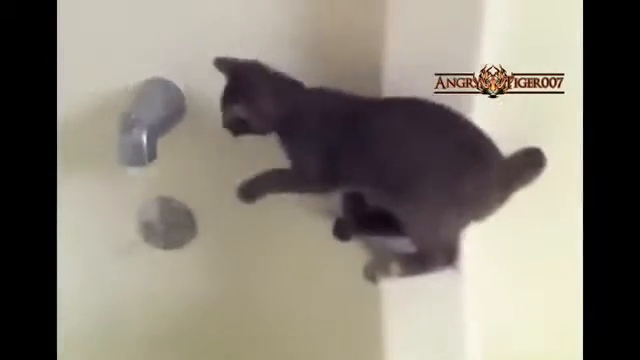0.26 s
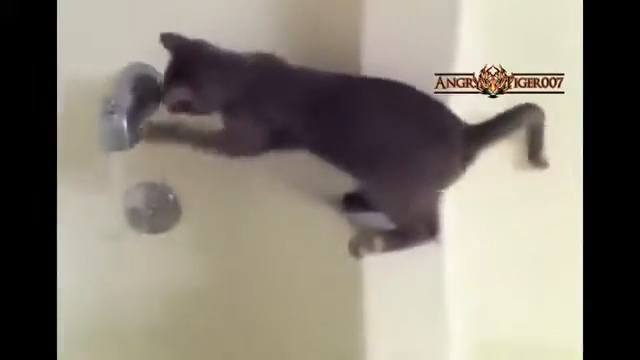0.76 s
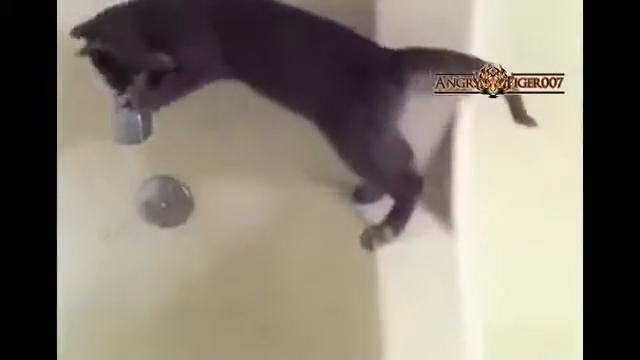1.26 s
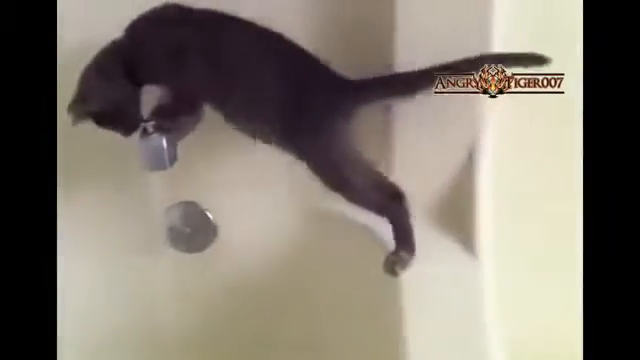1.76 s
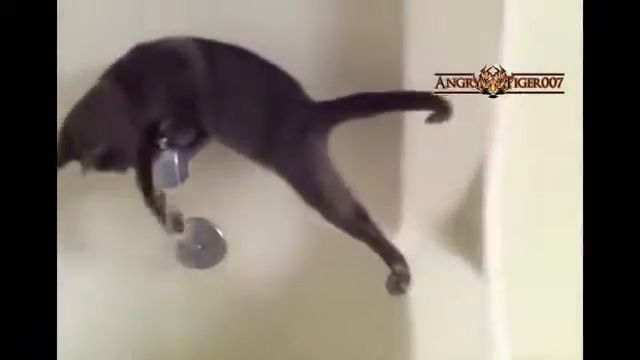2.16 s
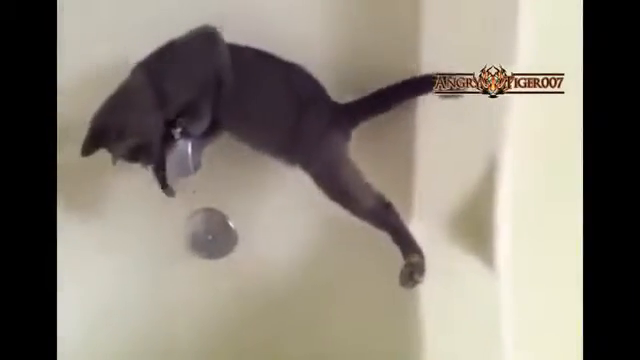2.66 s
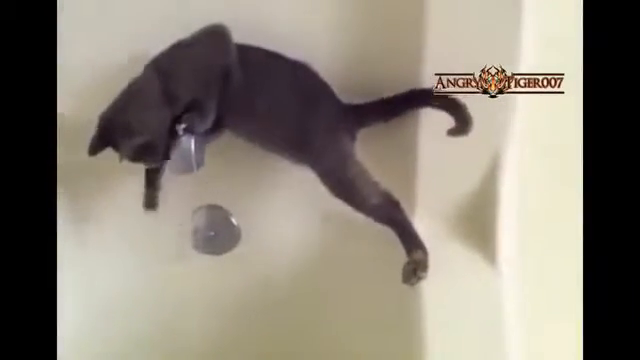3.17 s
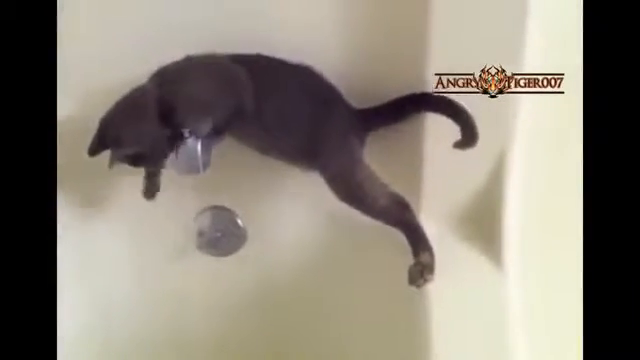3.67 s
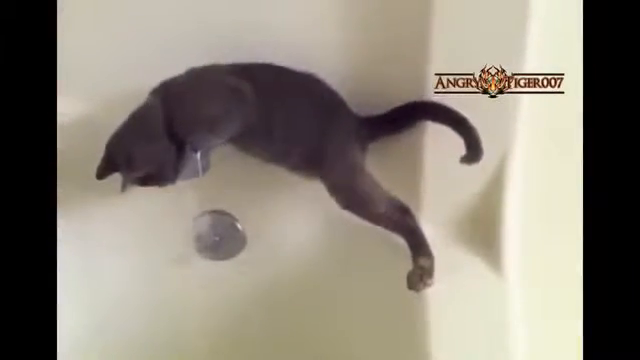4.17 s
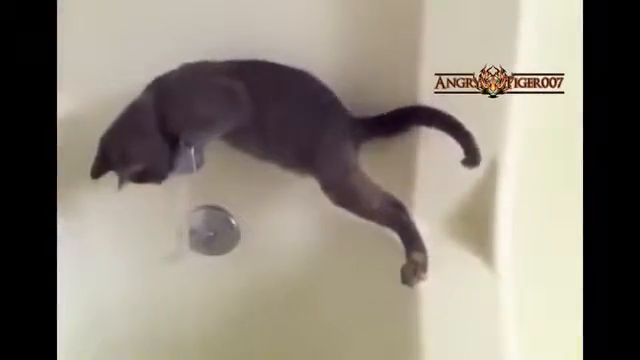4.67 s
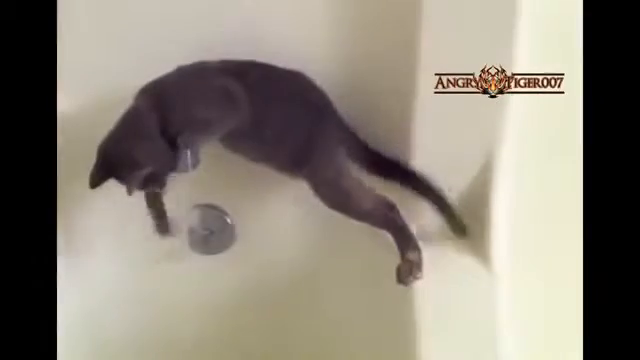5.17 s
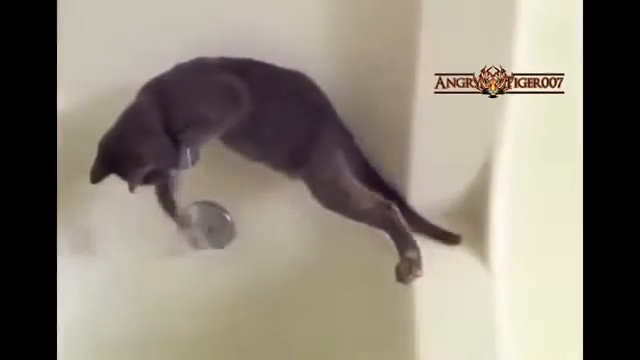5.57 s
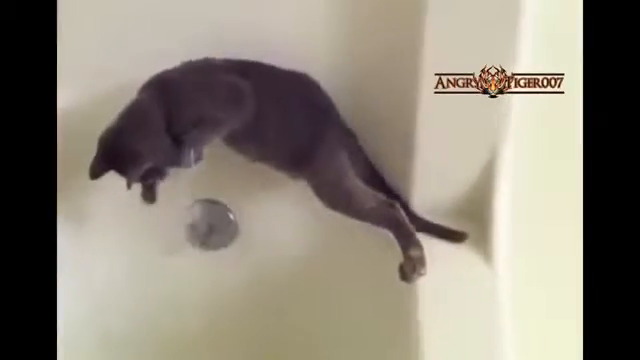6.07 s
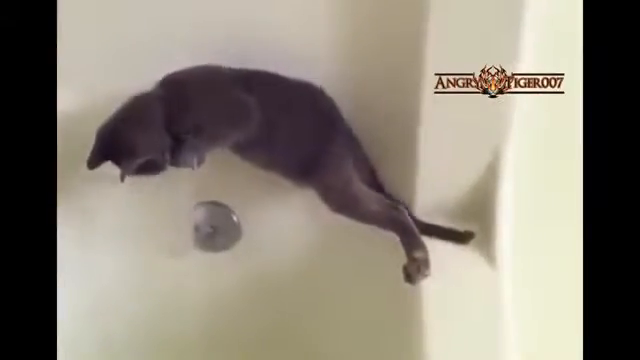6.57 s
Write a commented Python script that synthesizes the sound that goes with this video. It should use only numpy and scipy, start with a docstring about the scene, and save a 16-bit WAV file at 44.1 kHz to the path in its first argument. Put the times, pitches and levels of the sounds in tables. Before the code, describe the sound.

Close, splashy trickle from a tub tap: fine fizzing patter, sharp uneven drops, tiny chirping bubbles, and barely audible soft thuds on the tub.

```python
"""A thin stream drums on a wet bathtub floor by the drain, with a fine patter and fizz of small impacts.
Larger drops slap the water film, trap short-lived bubbles and scatter spray; stray bubbles tick and chirp.
A few soft bumps, as from a pawing cat, ring the modes of the tub shell over a low rumble.
Random impulses drive resonances, decaying sines make the bubbles, and hard walls add an echo and a brief tail."""
import sys
import numpy as np
from scipy import signal
from scipy.fft import rfft, irfft, next_fast_len
from scipy.io import wavfile
from scipy.ndimage import uniform_filter1d

SR = 44100
rng = np.random.default_rng(int(sys.argv[2]) if len(sys.argv) > 2 else 0)


def wrap_up_sound(samples):
    """Save the sound to the file named by the first command line argument, as 16-bit audio."""
    columns = np.atleast_2d(samples).T
    # keep every value between -1 and 1, then stretch to whole-number steps
    tamed = np.clip(columns, -1, 1)
    steps = np.round(tamed * 32767).astype(np.int16)
    wavfile.write(sys.argv[1], SR, steps)


N = 300321  # length in samples
TOP_HZ = 15100  # upper band limit, also a cap on the nominal pitch of bubble shards and fallback droplets

# Strength of the stream. Each row: time in seconds, strength in dB before each layer's own scaling.
STREAM_FLOW = [(0.0, -34), (0.13, -36.5), (.2, -35.5), (.26, -40), (.45, -34.5), (0.74, -37.5),
               (0.91, -35.5), (1.0, -40), (1.12, -35.5), (1.35, -37), (1.55, -36.5), (1.72, -37),
               (1.93, -36.5), (2.08, -36.5), (2.4, -38), (2.58, -39), (2.8, -40), (3.02, -38), (3.4, -38),
               (3.9, -35.5), (4.2, -39), (4.5, -39), (4.76, -34.5), (4.88, -37.5), (5.0, -39), (5.16, -39),
               (5.23, -38), (5.73, -39.5), (6.05, -38.5), (6.14, -45), (6.2, -46), (6.26, -35), (6.5, -40),
               (6.81, -38.5)]
# Modes of the tub shell. Each row: frequency in Hz, width in Hz, relative level in dB.
SHELL_MODES = [(124, 40, -12.5), (162.4, 9.2, 1), (173.3, 9.7, 4.5), (239, 14, -10), (259, 11.3, -7.5),
               (287.5, 20, -13), (353.5, 25, -14), (461.6, 15.5, -9), (690, 24, -27), (900, 67, -21),
               (1027, 17, -16.5), (1450, 71, -11.5)]


def stream(drum_patchy_db=1.4, patter_patchy_db=3.0, fizz_patchy_db=1.5):
    """Random impacts excite shell modes and splash on the film; a stronger flow is brighter, as fizz outgrows patter."""
    # Each row: time in seconds, level of the shell's drumming in dB.
    drum_level = [(0.0, -53.5), (.1, -49), (.2, -43.5), (.26, -52), (.6, -50), (.66, -54), (.73, -44.5),
                  (.87, -49.5), (1.14, -49), (1.3, -49), (1.74, -51.5), (2.56, -47), (2.79, -49.5),
                  (2.84, -56), (2.92, -44.5), (3.0, -47.5), (3.72, -47.5), (3.88, -47), (4.97, -49.5),
                  (5.1, -42), (5.15, -49), (5.22, -49), (6.11, -47.5), (6.19, -69), (6.23, -50),
                  (6.35, -47.5), (6.81, -51.5)]
    # Patter spectrum. Each row: frequency in Hz, relative density in dB per Hz.
    patter_spectrum = [(100, -6.5), (300, -8.5), (600, -6.5), (1150, -10.5), (1500, -7.5), (2400, -2),
                       (3400, -11.5), (4300, -5.5), (5500, -18), (9000, -2), (15000, -20.5)]
    # Fizz spectrum. Each row: frequency in Hz, relative density in dB per Hz.
    fizz_spectrum = [(1500, -5.5), (4000, -12), (5500, -1), (7000, 2.5), (9000, -2.5), (10300, 3),
                     (13000, 9), (15000, 4.5)]
    patter_db, fizz_db = -44, -4.5  # fizz is relative to the flow
    patter_growth = 0.18  # dB of patter for each dB of flow
    flow_db = curve(STREAM_FLOW)
    swell_db = flow_db - flow_db.mean()

    def shell_gain(hz):
        low_cut = hz ** 4 / (hz ** 4 + 125 ** 4)
        high_cut = 1 / (1 + (hz / 1400) ** 2)
        return peaks(SHELL_MODES, hz) * low_cut * high_cut

    drum = patchy(coloured(droplets(900, 0.98), shell_gain), drum_patchy_db)
    patter = unit(wandering(droplets(380, 3.5), patter_spectrum, wet_db=0.5))
    patter = patchy(patter, patter_patchy_db)
    fizz = unit(wandering(droplets(700, 4.0), fizz_spectrum, wet_db=7.5))
    fizz = patchy(fizz, fizz_patchy_db)
    drumming = amp(curve(drum_level)) * unit(drum)
    pattering = amp(patter_db + patter_growth * swell_db) * patter
    fizzing = amp(flow_db + fizz_db) * fizz
    return drumming + pattering + fizzing


def droplets(rate, spread_db):
    """Impacts form a random impulse train, rate a second, with uneven sizes (dB) and random signs."""
    sizes_db = spread_db * np.clip(rng.standard_normal(N), -2, 2)
    impulses = amp(sizes_db) * rng.choice([-1, 1], N)
    return impulses * (rng.random(N) < rate / SR)


def wandering(x, spectrum, wet_db, count=40):
    """A wandering landing point couples anew to the drain's resonances and the walls in each stretch of sound."""
    # Each row: time in seconds, factor on the dB lift of the drain's resonances.
    drain_ring = [(0, 0.71), (1.2, 1.1), (2.0, 0.69), (4.5, 1.09), (6.8, 1.2)]
    out, step, ring = np.zeros(N), N // count + 1, curve(drain_ring)
    for start in range(0, N, step):
        reflected = walls(x[start:start + step], wet_db)
        add(out, start / SR, by_drain(reflected, lambda hz: along(spectrum, hz), ring[start]))
    return out


def patchy(x, depth_db):
    """A shifting mix of droplet sizes modulates the spectrum in patches of time and frequency."""
    z = signal.stft(x, nperseg=512)[2]
    field = uniform_filter1d(rng.standard_normal(z.shape), size=14, axis=0)
    field = uniform_filter1d(field, size=9, axis=1)
    return signal.istft(z * amp(depth_db * unit(field)), nperseg=512)[1][:N]


def drops():
    """Larger drops are separate impact transients, each with a faint short swell of noise leading in."""
    # Each row: landing time in seconds, bubble level in dB, bubble pitch in Hz, pitch spread in octaves,
    # slap level in dB, spray level in dB; the levels stand before the offsets of each layer.
    landings = [(.012, -28, 9050, .2, -35, -50), (.0743, -30, 12500, .3, -37, -45),
                (0.1426, -24.5, 2810, 0.19, -31, -30), (0.176, -29, 7500, 0.5, -29, -30.5),
                (0.294, -24, 6100, 0.53, -37, -35), (.318, -29.5, 2660, 0.24, -40, -37),
                (0.3388, -13, 8400, 0.058, -38, -50), (0.429, -22.5, 3100, 0.34, -30, -36),
                (.477, -26, 3950, 0.3, -43, -52), (0.5504, -15.5, 2520, 0.46, -24, -34.5),
                (0.622, -24, 3140, 0.42, -47, -35), (0.643, -21, 6870, 0.13, -40, -54),
                (0.69, -20.5, 2290, 0.47, -25, -35), (0.742, -16.5, 2210, 0.52, -25, -34),
                (.7505, -29, 2000, 0.28, -25, -48), (.764, -28, 2080, 0.37, -37, -51),
                (0.778, -31, 2380, 0.45, -41, -54), (0.806, -28, 2310, 0.58, -30, -38),
                (0.8669, -21.5, 4060, 0.14, -29, -58), (0.9123, -22, 4240, 0.37, -22, -30),
                (1.0288, -22, 8600, 0.17, -39, -33), (1.1524, -24, 3600, 0.29, -22, -36),
                (1.168, -29, 6400, .6, -28, -34), (1.239, -19, 2740, 0.29, -32, -32),
                (1.267, -20.5, 6900, 0.54, -27, -47), (1.293, -41, 2930, 0.25, -43, -35),
                (1.314, -26, 10500, 0.37, -44, -34), (1.415, -22.5, 7430, .3, -34, -50),
                (1.482, -31, 2670, 0.35, -41, -46), (1.492, -24, 7130, .3, -44, -50),
                (1.585, -15, 4570, 0.66, -26, -53), (1.6877, -22, 3140, 0.65, -27, -36),
                (1.855, -15.5, 3980, 0.58, -33, -43), (1.913, -26.5, 3050, 0.08, -41, -38),
                (1.98, -34.5, 2530, 0.31, -27, -36.5), (2.012, -21, 3420, 0.39, -36, -49),
                (2.03, -32, 11100, .3, -35, -36), (2.0837, -27, 3950, 0.21, -33, -34),
                (2.118, -27, 7900, 0.5, -39, -40), (2.188, -26, 3900, 0.31, -40, -42),
                (2.2432, -24, 3560, 0.25, -20, -32), (2.26, -25.5, 3700, 0.21, -40, -49),
                (2.318, -19.5, 5430, 0.7, -38, -33), (2.388, -23.5, 10500, 0.45, -48, -35),
                (2.461, -24, 9450, 0.85, -33, -28), (2.47, -23.5, 2110, 0.34, -41, -46),
                (2.503, -18, 2475, 0.28, -31, -41), (2.513, -25, 2290, 0.49, -34, -46),
                (2.528, -33, 2470, 0.3, -31, -38), (2.648, -24.5, 11600, 0.24, -35, -47),
                (2.688, -23, 4420, 0.38, -36, -43), (2.784, -38, 3770, 0.088, -48, -54),
                (2.87, -28, 5960, 0.54, -28, -44), (2.902, -31, 3170, 0.24, -40, -30.5),
                (2.9765, -20, 2250, 0.37, -28, -33.5), (2.988, -28, 2380, 0.54, -36, -44),
                (3.0038, -20.5, 2870, 0.49, -27, -36), (3.031, -26, 7600, 0.44, -37, -36),
                (3.052, -28, 2720, 0.12, -36, -46), (3.1891, -25.5, 2830, 0.089, -38, -35),
                (3.21, -27, 2900, 0.26, -30, -42), (3.271, -27.5, 3500, 0.41, -21, -36),
                (3.318, -27, 2620, 0.39, -34, -45), (3.403, -28, 3570, 0.52, -29, -37),
                (3.469, -22.5, 7700, 0.34, -46, -41), (3.642, -24, 7100, .4, -50, -59),
                (3.658, -22.5, 5600, 0.73, -45, -51), (3.7225, -24, 7300, 0.48, -22, -38),
                (3.772, -34, 4020, .3, -41, -48), (3.782, -19, 9000, 0.49, -40, -42),
                (3.8872, -23, 2905, 0.54, -25, -38), (3.935, -37, 5530, .5, -46, -31),
                (3.9741, -21, 3900, 0.49, -21, -31.5), (4.022, -14, 5000, 0.71, -38, -32.5),
                (4.1383, -24, 2710, 0.28, -28, -39), (4.196, -24.5, 5940, .6, -36, -35.5),
                (4.248, -18.5, 6870, 0.53, -21, -40), (4.294, -30, 7300, .3, -39, -48),
                (4.336, -32, 2500, 0.22, -29, -50), (4.381, -26.5, 8400, .4, -42, -43),
                (4.409, -35, 2450, 0.23, -42, -50), (4.474, -29, 7060, 0.33, -43, -44),
                (4.502, -31, 2540, 0.19, -34, -52), (4.5706, -18, 4520, 0.48, -19, -36),
                (4.6124, -19.5, 3230, 0.5, -30, -40), (4.6699, -10, 6930, 0.32, -23, -34),
                (4.7272, -18, 2870, 0.27, -32, -36), (4.755, -23, 7200, .4, -31, -37),
                (4.839, -22.5, 3310, 0.25, -23, -39), (4.84, -19.5, 7730, 0.3, -36, -46),
                (4.927, -27, 9500, .4, -42, -38), (4.9583, -29, 2260, 0.26, -23.5, -34),
                (5.048, -23, 13500, .1, -48, -46), (5.058, -37, 6100, 0.33, -44, -31.5),
                (5.0767, -17.5, 10500, 0.33, -43, -35), (5.1886, -23, 3440, 0.33, -24, -35),
                (5.22, -32, 12100, .3, -56, -42), (5.274, -28, 3400, 0.33, -30, -39),
                (5.3286, -19, 3270, 0.71, -28, -32.5), (5.346, -26, 4030, 0.72, -26, -36),
                (5.409, -30, 2660, 0.29, -29, -50), (5.466, -22, 7300, 0.22, -46, -42),
                (5.482, -18.5, 7600, 0.31, -29, -39), (5.496, -24.5, 3900, 0.31, -31, -37),
                (5.5455, -17, 6800, 0.34, -18.5, -33), (5.568, -21.5, 8600, 0.22, -42, -47),
                (5.611, -28.5, 2960, 0.27, -41, -52), (5.6308, -20.5, 6470, 0.58, -19.5, -31),
                (5.649, -32, 8000, .4, -42, -46), (5.708, -27, 8400, .2, -42, -50),
                (5.728, -25, 7700, 0.22, -23, -31.5), (5.759, -20, 3630, 0.33, -23, -36),
                (5.793, -25, 2570, .3, -39, -44), (5.822, -19.5, 7600, 0.36, -39, -48),
                (5.8889, -25.5, 3650, 0.41, -25, -32), (5.935, -28, 9000, .3, -48, -41),
                (5.979, -24, 3470, 0.34, -25, -45), (6.021, -29.5, 2400, .5, -29, -44),
                (6.069, -30, 2760, 0.31, -23, -37), (6.222, -24.5, 7840, .3, -26, -39),
                (6.343, -24, 7600, 0.37, -23.5, -46), (6.3908, -21.5, 2690, 0.32, -25.5, -44),
                (6.4382, -23, 4400, 0.44, -39, -33), (6.563, -28, 3940, 0.3, -21.5, -34.5),
                (6.635, -27, 7350, 0.43, -31, -33.5), (6.734, -23.5, 3060, 0.55, -23, -32),
                (6.787, -23, 6650, 0.31, -22, -37), (6.801, -19.5, 6970, 0.32, -25, -30)]
    lead_in_s, lead_in_db = 0.0025, -16.5  # the lead-in level is relative to the bubble level
    out, swell = np.zeros(N), np.hanning(SR // 200)
    for s, level_db, hz, spread, slap_db, spray_db in landings:
        lead_in = coloured(rng.standard_normal(len(swell)), lambda f: peaks([(hz, hz / 2, 0)], f))
        add(out, s - lead_in_s, amp(level_db + lead_in_db) * unit(lead_in) * swell)
        add(out, s, drop(level_db, hz, spread, slap_db, spray_db))
    return out


def drop(level_db, hz, spread, slap_db, spray_db):
    """Impact noise and bubble resonance combine: a slap, a bubble amid a crackle of lesser ones, and spray."""
    # Slap spectrum. Each row: frequency in Hz before the shift with drop size, relative density in dB per Hz.
    slap_spectrum = [(60, -45), (300, -4), (1000, -13), (1500, 0), (1900, 2.5), (2700, 12), (4200, 0.5),
                     (5500, 5), (12000, -34)]
    # Spray spectrum. Each row: frequency in Hz, relative density in dB per Hz.
    spray_spectrum = [(2000, -15.5), (4500, -2.5), (6500, 5.5), (10000, 3), (13000, 5), (15000, 1)]
    bubble_offset_db, crackle_offset_db, fallback_offset_db = -6.5, -16, -19
    # Slap and spray offsets apply before the snap and the walls add to the shower of impacts.
    slap_offset_db, spray_offset_db = -11.5, -3.5
    crackle_hz, crackle_follows, crackle_octaves = 6260, 0.67, 0.46
    t = np.arange(SR // 10) / SR
    centre_hz = crackle_hz * (hz / crackle_hz) ** crackle_follows  # leans towards the bubble's pitch
    bulk = 4000 / hz  # a bigger drop has a lower bubble, and slaps deeper and longer

    def crackle_colour(f):
        octaves = np.log2((f + 1) / centre_hz)
        return -20 * np.log10(1 + (octaves / crackle_octaves) ** 2)

    def slap_colour(f):
        return along(slap_spectrum, f * bulk ** 0.14)

    def spray_colour(f):
        return along(spray_spectrum, f)

    slap = burst(t, slap_colour, snap_db=-6.5, decay_s=0.0075 * bulk ** 0.3, grain_db=4.0)
    crackle = burst(t, crackle_colour, snap_db=-3, decay_s=0.006, grain_db=7.0)
    spray = burst(t, spray_colour, snap_db=0.5, decay_s=0.025, grain_db=4.0)
    splash = amp(slap_db + slap_offset_db) * slap + amp(spray_db + spray_offset_db) * spray
    splash += amp(level_db + crackle_offset_db) * crackle
    bubbles = amp(level_db + bubble_offset_db) * cavity(t, hz, spread)
    bubbles += amp(level_db + fallback_offset_db) * fallback(t, hz)
    return walls(bubbles + splash, wet_db=-4, echo_db=-11)


def burst(t, spectrum, snap_db, decay_s, grain_db, snap_s=0.0025, attack_s=0.0014):
    """An impact radiates a sharp snap and a decaying shower of grainy noise."""
    impacts, sizes = rng.standard_normal((2, len(t)))
    shower = (1 - np.exp(-t / attack_s)) * np.exp(-t / decay_s)
    snap = (t / snap_s) * np.exp(1 - (t / snap_s) ** 2)
    noise = by_drain(impacts * amp(grain_db * sizes), spectrum, ring=0.75)
    return unit(noise) * (shower + amp(snap_db) * snap)


def cavity(t, hz, spread, count=4, whole_db=15.0, shard_db=-4, shard_spread=0.39, breakup_s=0.00425, glide=0.97):
    """A closing crater resonates as one rising bubble; a ragged one (wide spread) as a run of ever higher bubbles."""
    delays = breakup_s * np.sort(rng.uniform(0.06, 1, count))
    steps = (np.arange(count) + rng.random(count)) / count
    pitches = np.minimum(hz * 2 ** (spread * (2 * steps - 1)), TOP_HZ)
    shards = sum(bubble(t - delay, pitch, cycles=1.07, swell=1.0) for delay, pitch in zip(delays, pitches))
    ragged = np.tanh(spread / shard_spread)
    main = bubble(t, hz, cycles=3.18, rise=glide * spread, swell=1.46)
    return amp(whole_db * (1 - ragged)) * main + amp(shard_db) * ragged * shards


def fallback(t, hz, count=4, longest_s=0.045, octaves=0.66):
    """Droplets thrown up fall back after random flights, each exciting a tiny bubble resonance."""
    flights = longest_s * rng.uniform(.1, 1, count)
    pitches = np.minimum(hz * 2 ** (octaves * rng.uniform(-1, 1, count)), TOP_HZ)
    return sum(bubble(t - flight, pitch, cycles=1.3) for flight, pitch in zip(flights, pitches))


def bubble(t, hz, cycles, rise=0.0968, swell=0.3):
    """A trapped bubble is a damped oscillator: it swells and decays over cycles, rising in pitch (octaves)."""
    age = hz * np.maximum(t, 0)  # in cycles
    envelope = (1 - np.exp(-age / swell)) ** 2 * np.exp(-age / cycles)
    pitch = hz * 2 ** (rise * np.tanh(age / cycles - 1))
    return envelope / envelope.max() * np.sin(2 * np.pi * np.cumsum(pitch) / SR)


def small_bubbles(count=150, level_db=-30, spread_db=4, centre_hz=5800, spread=0.9):
    """Small bubbles under the stream resonate high, ticking faintly at random moments."""
    out, t = np.zeros(N), np.arange(SR // 50) / SR
    for when, size, width in rng.random((count, 3)):
        hz = min(centre_hz * np.exp(spread * (2 * width - 1)), TOP_HZ)
        tick = walls(bubble(t, hz, cycles=1.8), wet_db=-2)
        add(out, when * N / SR, amp(level_db + spread_db * (2 * size - 1.0)) * tick)
    return out


def gurgle(count=170, level_db=-36.5, spread_db=4.0, centre_hz=2900, octaves=0.6, wet_db=-4):
    """Larger bubbles in the puddle under the stream resonate lower, chirping upwards at random moments."""
    out, t = np.zeros(N), np.arange(SR // 50) / SR
    for when, size, width in rng.uniform(-1, 1, (count, 3)):
        chirp = bubble(t, centre_hz * 2 ** (octaves * width), cycles=2.1, rise=0.31)
        add(out, (when + 1) / 2 * N / SR, amp(level_db + spread_db * size) * walls(chirp, wet_db))
    return out


def stray_bubbles():
    """Bubble shedding follows the flow, so the stray bubbles fade when the stream thins."""
    growth = 0.61  # dB of stray bubbles for each dB of flow
    flow_db = curve(STREAM_FLOW)
    return amp(growth * (flow_db - flow_db.mean())) * (small_bubbles() + gurgle())


def bumps(width=0.68, shell_share=0.073, damping=1.3):
    """Soft contacts excite shell modes near a centre frequency, and scuff them with noise through broader modes."""
    # Each row: time in seconds, level in dB, centre frequency in Hz, contact time constant in seconds,
    # scuff level in dB against the ring.
    contacts = [(0.175, -52.5, 274, 0.023, 5), (1.44, -54.5, 330, 0.023, -2),
                (3.183, -47.5, 590, 0.028, -8), (3.702, -56.5, 513, 0.012, 13),
                (3.885, -52.5, 1110, .014, 8), (6.222, -53, 384, 0.0059, -7)]
    out, t = np.zeros(N), np.arange(SR // 4) / SR
    for s, db, centre_hz, contact_s, scuff_db in contacts:
        reached = []
        for hz, w, mode_db in SHELL_MODES:
            distance = np.log(hz / centre_hz) / width
            reached.append((hz, w, shell_share * mode_db - 10 * distance ** 2))
        damped = [(hz, damping * w, level) for hz, w, level in reached]
        ring = np.zeros(len(t))
        for hz, w, level in reached:
            decay = np.exp(-np.pi * w * t)
            ring += amp(level) * decay * np.sin(2 * np.pi * (hz * t + rng.random()))
        ring *= (1 - np.exp(-t / contact_s)) ** 2
        friction = rng.standard_normal(len(t)) * t * np.exp(-t / contact_s)
        scuff = coloured(friction, lambda hz: peaks(damped, hz))
        add(out, s, amp(db) * unit(unit(ring) + amp(scuff_db) * unit(scuff)))
    return out


def by_drain(x, colour, ring=1, drift=0.013):
    """Resonances around the drain lift a given colour (dB over frequency), and shift as the puddle moves."""
    # Each row: frequency in Hz before the shift, width in Hz, lift in dB before the ring factor.
    resonances = [(1932, 37, 7.5), (2453, 97, 10.5), (2760, 170, 2.5), (3914, 480, 7.5), (6870, 530, 1.5),
                  (8520, 970, 1)]
    shifts = 1 + drift * rng.uniform(-0.68, 1, len(resonances))

    def gain(hz):
        lift_db = 0
        for (c, w, db), shift in zip(resonances, shifts):
            lift_db = lift_db + db / (1 + (2 * (hz - c * shift) / w) ** 2)
        return amp(colour(hz) + ring * lift_db)

    return coloured(x, gain)


def walls(x, wet_db, echo_db=-9, echo_s=.0063, build_s=0.0024):
    """Hard walls reflect: the far side of the tub sends one clear echo, and the bathroom a brief diffuse tail."""
    # Each row: frequency in Hz, time in seconds for the tail to fall by 60 dB.
    decay_times = [(200, 0.046), (2500, 0.29), (7000, 0.23), (14000, 0.034)]
    hz, t, z = signal.stft(rng.standard_normal(SR // 4), SR, nperseg=256)
    decay = amp(-60 * t / along(decay_times, hz)[:, None])
    response = signal.istft(z * decay, SR, nperseg=256)[1]
    response *= 1 - np.exp(-np.arange(len(response)) / SR / build_s)
    response *= amp(wet_db) / np.linalg.norm(response)
    response[0] += 1  # direct sound
    response[round(echo_s * SR * rng.uniform(.9, 1.1))] += amp(echo_db)
    return signal.fftconvolve(x, response)


def rumble():
    """The room's low rumble is steady noise shaped by a falling spectrum."""
    # Each row: frequency in Hz, relative density in dB per Hz.
    rumble_spectrum = [(20, 3), (60, -6), (110, -6), (300, -18), (1000, -31), (4000, -60)]
    noise = coloured(rng.standard_normal(N), lambda hz: amp(along(rumble_spectrum, hz)))
    return amp(-66.5) * unit(noise)


def coloured(x, gain):
    """A minimum-phase filter, built by folding the cepstrum, gives x a gain over frequency causally."""
    m = next_fast_len(len(x) + 4096, True)
    cepstrum = irfft(np.log(np.maximum(gain(np.fft.rfftfreq(m, 1 / SR)), 1e-6)), m)
    cepstrum[1:m // 2] *= 2
    cepstrum[m // 2 + 1:] = 0
    return irfft(rfft(x, m) * np.exp(rfft(cepstrum)), m)[:len(x)]


def peaks(modes, hz):
    """Resonators with incoherent phases add in power; returns their joint gain."""
    power = 0
    for c, w, db in modes:
        power = power + amp(db) ** 2 * (hz * w) ** 2 / ((c * c - hz * hz) ** 2 + (hz * w) ** 2)
    return np.sqrt(power)


def along(points, hz):
    """Spectra are read on a logarithmic frequency axis between (Hz, value) points."""
    f, v = np.transpose(points)
    return np.interp(np.log(hz + 1), np.log(f), v)


def curve(rows):
    """Slow changes are read linearly between (seconds, value) points, at every sample."""
    s, value = np.transpose(rows)
    return np.interp(np.arange(N) / SR, s, value)


def amp(db):
    """Decibels are logarithmic: 20 dB is a tenfold amplitude gain."""
    return 10 ** (np.asarray(db) / 20)


def unit(x):
    """Levels compare by root mean square, here scaled to 1."""
    return x / np.sqrt(np.mean(x ** 2) + 1e-20)


def add(track, s, sound):
    """Sounds superpose: mix one into the track at s seconds."""
    room_left = track[max(round(s * SR), 0):][:len(sound)]
    room_left += sound[:len(room_left)]


def scene():
    """By superposition, stream, drops, stray bubbles and bumps sum over the room's rumble."""
    return (stream() + drops() + stray_bubbles() + bumps() + rumble())[None]


def record(dry):
    """A small microphone acts as a high-pass that thins the deepest bass; a sharp cut-off ends the band at the top."""
    m = next_fast_len(N + SR // 2)
    hz = np.fft.rfftfreq(m, 1 / SR)
    bass_cut = hz / np.hypot(hz, 45)
    return irfft(rfft(dry, m) * bass_cut * (hz < TOP_HZ), m)[..., :N]


dry = scene()
out = record(dry)
wrap_up_sound(out)
```